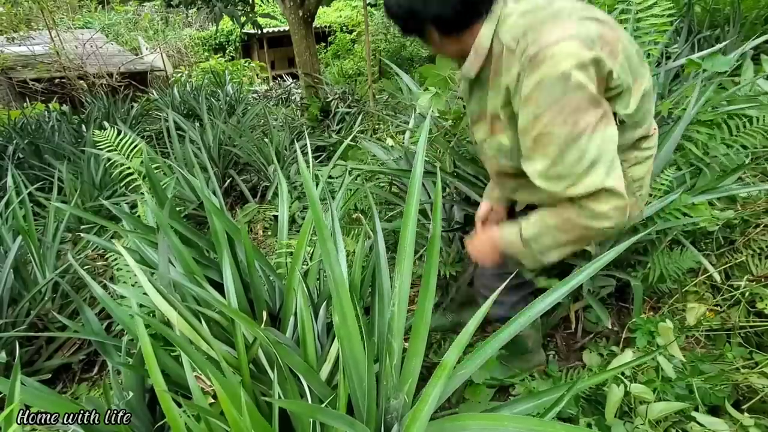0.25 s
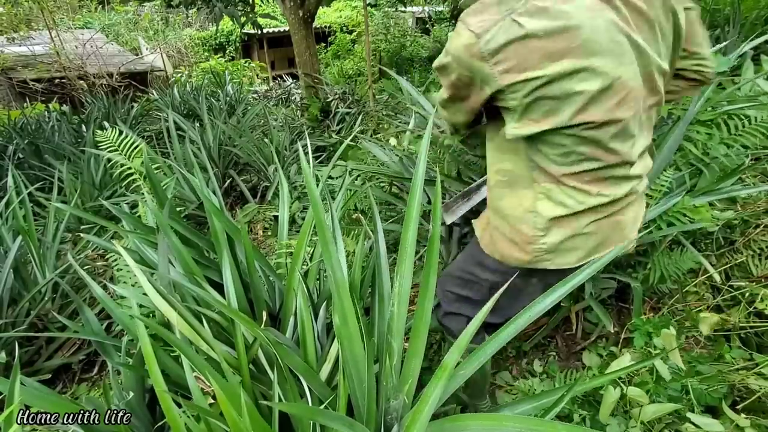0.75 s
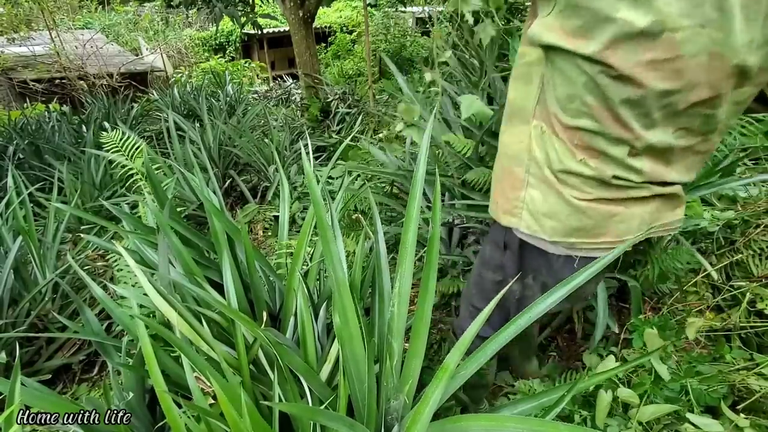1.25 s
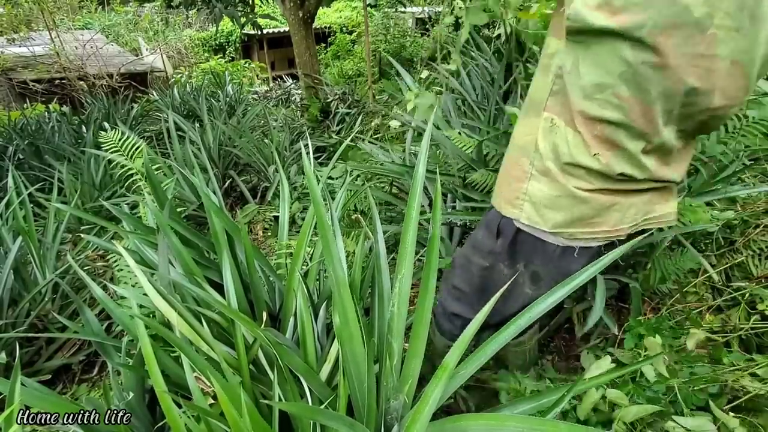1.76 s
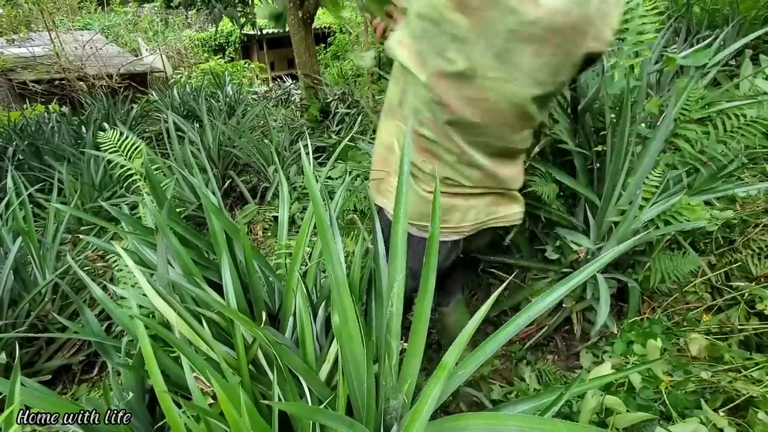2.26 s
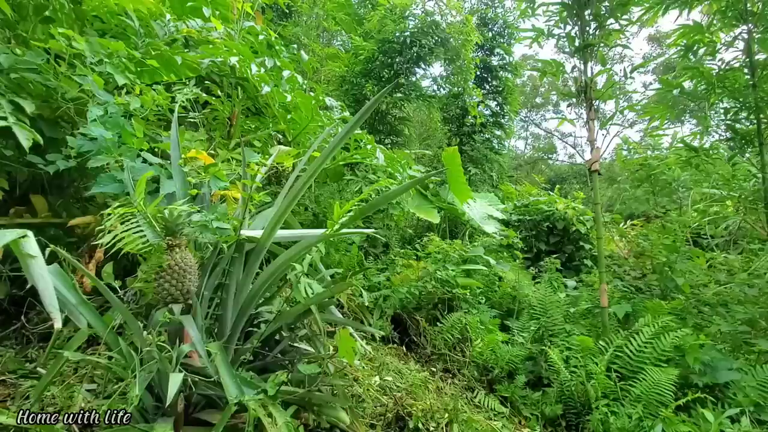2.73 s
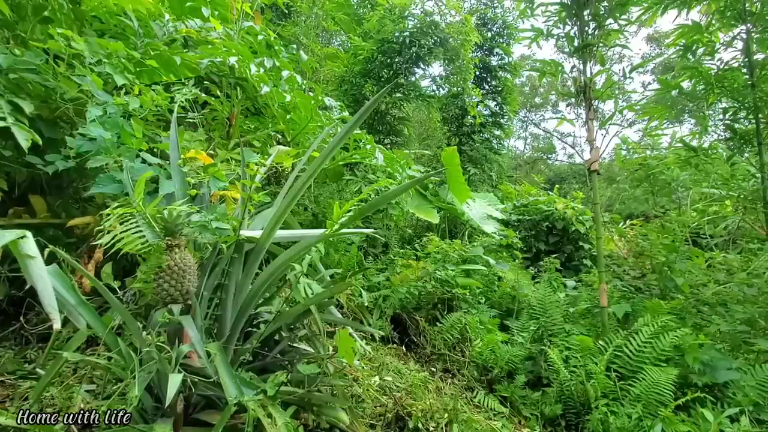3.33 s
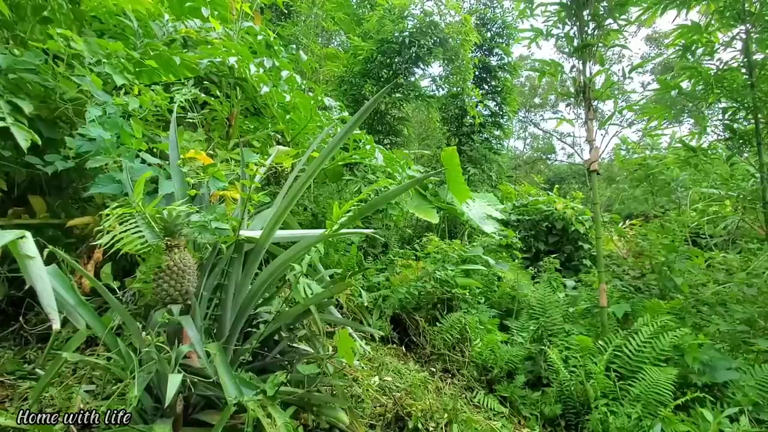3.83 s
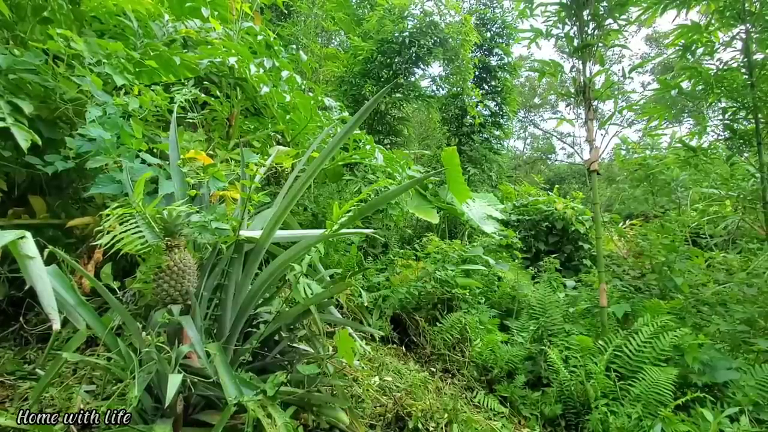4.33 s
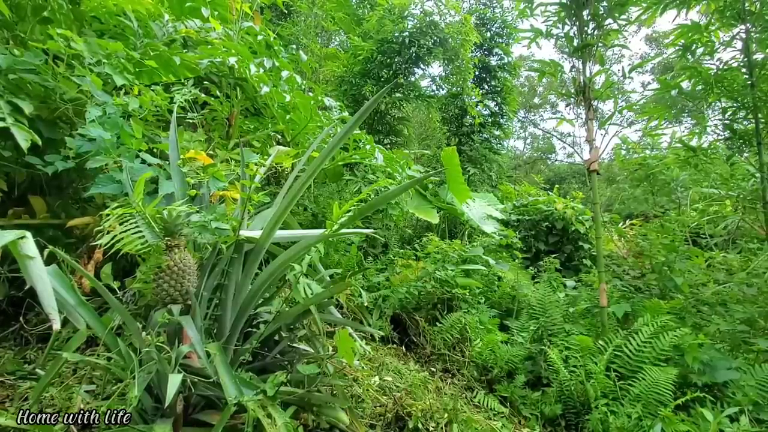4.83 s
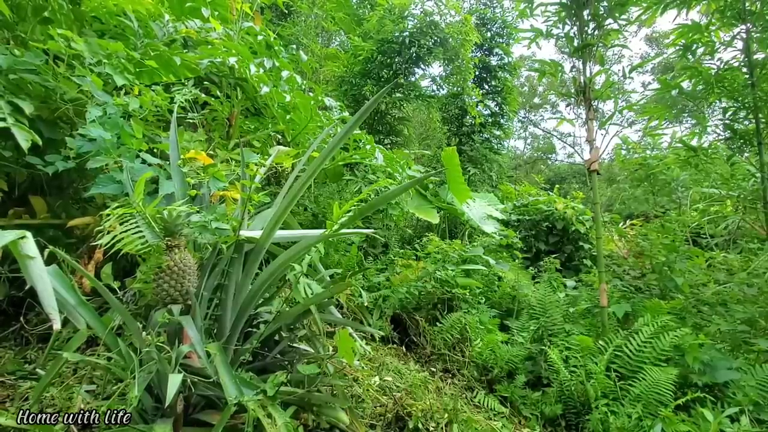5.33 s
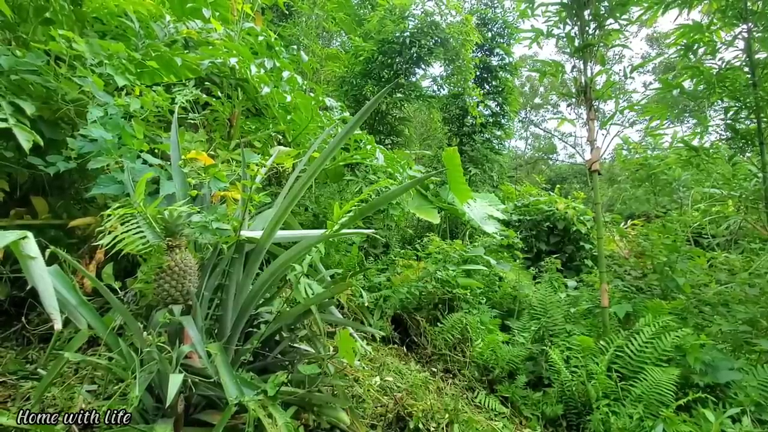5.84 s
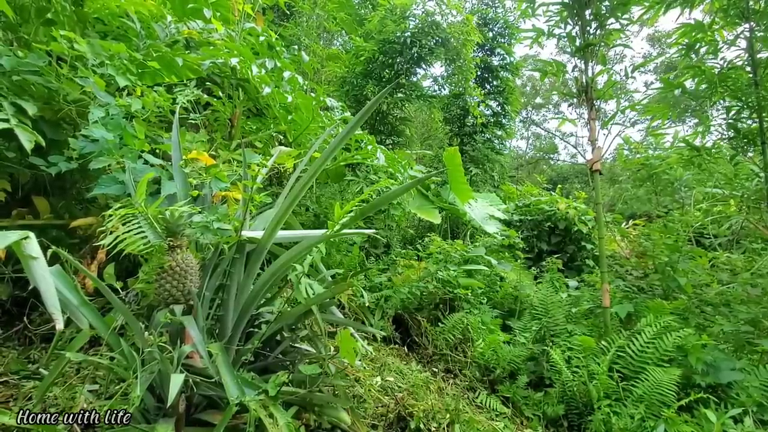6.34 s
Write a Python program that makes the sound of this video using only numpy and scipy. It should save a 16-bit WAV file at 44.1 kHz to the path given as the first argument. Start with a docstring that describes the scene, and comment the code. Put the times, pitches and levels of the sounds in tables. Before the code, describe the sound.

Weeds are pulled and slashed with rustles and sharp stem snaps outdoors, while a distant rooster crows at first and insects buzz faintly.

```python
"""A far rooster crows hoarsely over buzzing cicadas as someone starts pulling and slashing garden weeds.
Stiff leaves and stalks crackle with tiny cracks, roots tear the soil, footsteps thud, stems snap and ring.
After a short silence the work is heard from a second spot: the rooster is gone, the crickets' thin
trills come forward and a far bird whistles softly."""
import sys
import numpy as np
from scipy import signal
from scipy.io import wavfile

SR = 44100
rng = np.random.default_rng(int(sys.argv[2]) if len(sys.argv) > 2 else 0)


def bounce(signal):
    """Save signal as a 16-bit WAV file at the path given by the first command-line argument."""
    frames = np.transpose(np.atleast_2d(signal))
    limited = np.clip(frames, -1, 1)
    pcm = np.round(limited * 32767).astype(np.int16)
    wavfile.write(sys.argv[1], SR, pcm)


N = 290178
SWITCH_S = 2.715   # cut from the first spot to the second
STEP = 32   # samples between points of the slow gains
BAND_EDGES_HZ = 42 * 2 ** (np.arange(23) * .392)
BAND_HZ = np.sqrt(BAND_EDGES_HZ[1:] * BAND_EDGES_HZ[:-1])


def from_db(db):
    """Decibels to gain."""
    return np.exp(np.asarray(db) * (np.log(10) / 20))


def rms_one(x):
    """Scale to unit power."""
    return x / np.sqrt(np.mean(x ** 2) + 1e-20)


def at_hz(points, hz, column=1):
    """Read a curve on a log-frequency axis."""
    points = np.array(points)
    return np.interp(np.log(hz), np.log(points[:, 0]), points[:, column])


def by_spot(pair):
    """First value before the cut, second after."""
    cut = int(SWITCH_S * SR)
    return np.repeat(np.asarray(pair, float), [cut, N - cut])


def drift(rate_hz):
    """Smooth random modulation of unit power."""
    r = np.exp(-80 * np.pi * rate_hz / SR)
    slow = signal.lfilter([1], [1, -2 * r, r * r], rng.standard_normal(N // 40 + 2002))[2000:]
    return np.interp(np.arange(N) / 40, np.arange(len(slow)), rms_one(slow))


def resonate(x, hz, width_hz):
    """Two-pole resonance, unity gain at the peak."""
    r = np.exp(-np.pi * width_hz / SR)
    poles = [1, -2 * r * np.cos(2 * np.pi * hz / SR), r * r]
    return signal.lfilter(np.array([1, 0, -1]) * (1 - r * r) / 2, poles, x)


def share_db(spectrum):
    """Level of each band as a share of the whole."""
    inside = (BAND_HZ > spectrum[0][0]) & (BAND_HZ < spectrum[-1][0])
    power = from_db(2 * at_hz(spectrum, BAND_HZ)) * BAND_HZ * inside + 1e-9
    return 10 * np.log10(power / power.sum())


def noise_band(noises, k):
    """Band k at unit power; neighbouring bands alternate between two noises."""
    sos = signal.butter(2, BAND_EDGES_HZ[k:k + 2], "band", fs=SR, output="sos")
    return rms_one(signal.sosfilt(sos, noises[k % 2]))


def ears(direct, scattered, alike, pan_db):
    """Direct sound reaches the two microphones at different times; scattered sound is each one's own."""
    cut = int(SWITCH_S * SR)
    right = np.concatenate([np.roll(direct[:cut], -3), np.roll(direct[cut:], 20)])   # lag in samples
    both = np.sqrt(alike) * np.array([direct, right]) + np.sqrt(1 - alike) * scattered
    lean = from_db(pan_db / 2)
    return np.array([both[0] * lean, both[1] / lean])


# Stereo image at each spot: (frequency [Hz], left-right likeness [0-1], pan to the left [dB])
STEREO_IMAGE = [
    [(100, 0.92, -2), (690, 0.9, 2.5), (2500, 0.05, 1), (8000, 0.11, 0.2)],
    [(100, 0.83, -2), (700, 0.59, 4), (2390, 0.61, 0.5), (5070, 0.28, 2.5), (12900, 0.083, 4.5)],
]


def place_band(band, hz):
    """Give one band its width and pan at each spot."""
    alike, pan_db = [by_spot([at_hz(spot, hz, column) for spot in STEREO_IMAGE]) for column in (1, 2)]
    return ears(band[0], band[1:], alike, pan_db)


# Tone of the still air: (frequency [Hz], density [dB])
AIR_SPECTRUM = [(35, -27), (60, 4), (120, -11), (400, -9.5), (1200, -18), (2500, -11), (5000, -1),
                (9000, -14), (16000, -15.5)]


def still_air(spot_db):
    """A soft noise bed whose bands each waver on their own."""
    noises, out = rng.standard_normal((2, 3, N)), 0
    for k, band_db in enumerate(share_db(AIR_SPECTRUM)):
        gain = from_db(by_spot(spot_db) + band_db + 2 * drift(3))
        out += place_band(gain * noise_band(noises, k), BAND_HZ[k])
    return out


# Cricket voices: (pitch [Hz], chirp rate [1/s], level at the second spot [dB])
CRICKET_VOICES = [(3638, 15, -69), (3925, 16, -68), (4247, 14, -76)]


def crickets(spot_trim_db):
    """Thin, unevenly chirped tones that come and go."""
    out = 0
    for hz, rate, db in CRICKET_VOICES:
        chirp = 1 + .45 * np.sin(2 * np.pi * np.cumsum(rate * (1 + .25 * drift(3))) / SR)
        phase = 2 * np.pi * np.cumsum(hz * (1 + .002 * drift(8))) / SR
        tone = np.sin(phase + rng.uniform(0, 2 * np.pi, (2, 1)))
        wander_db = 2.5 * drift(4) + 1.5 * np.array([drift(5), drift(5)])
        out += tone * chirp * from_db(db + wander_db + by_spot(spot_trim_db))
    return out


def cicadas(hz, width_hz, throb_hz, depth, spot_db):
    """Throbbing noise rings in one body resonance."""
    throb = 1 + depth * np.sin(2 * np.pi * np.cumsum(throb_hz * (1 + 0.0186 * drift(0.53))) / SR)
    buzz = resonate(resonate(rng.standard_normal((2, N)) * throb, hz, width_hz), hz, width_hz)
    return rms_one(buzz) * from_db(by_spot(spot_db) + drift(2.3))


# Clear pips: (time [s], level [dB], pitch [Hz], length [s], pan to the left [dB])
CLEAR_PIPS = [(0.133, -48.5, 13600, 0.022, 8), (0.047, -48.5, 1500, 0.061, 10),
              (3.385, -75, 2306, 0.044, -6), (3.87, -71.5, 2390, 0.065, -11),
              (4.39, -81.5, 2510, 0.039, -40.5), (4.683, -72.5, 2430, 0.088, -9)]


def whistles_and_rings():
    """Soft whistles of a far bird and faint high rings, each a sine faded in and out."""
    t, out = np.arange(N) / SR, np.zeros((2, N))
    for s, db, hz, length, pan_db in CLEAR_PIPS:
        on = slice(round(s * SR), round((s + length) * SR))
        note = np.sin(np.pi * (t[on] - s) / length) * np.sin(2 * np.pi * hz * t[on])
        out[:, on] += note * from_db(db + np.array([[.5], [-.5]]) * pan_db)
    return out


# Crow syllables: (time [s], length [s], attack [s], scoop from below [share of pitch], pitch [Hz],
# sag [Hz/s], first partial [dB], second partial [dB])
CROW_SYLLABLES = [(0.044, 0.25, 0.026, 0.11, 700.5, 407, -49, -51.5),
                  (0.598, 0.65, 0.027, 0.12, 661, 61.1, -67, -50.5),
                  (1.1, 0.11, 0.035, 0.024, 608.5, 50, -54, -42),
                  (1.32, 0.066, 0.017, 0.0072, 678, 100, -34, -46),
                  (1.386, .11, 0.01, 0.0075, 685, 196, -57, -41.5),
                  (1.506, 0.16, 0.014, 0.015, 659, 151, -51.5, -46),
                  (1.924, 0.42, 0.033, .14, 675.6, 81.7, -56, -49),
                  (2.32, .3, 0.072, 0.0197, 671, 92.5, -47, -44.5),
                  (2.618, 0.081, .06, 0.0068, 620, 500, -59, -44.5)]
# Bright edge of the crow: (partial [number], level against the second partial [dB])
CROW_PARTIALS = [(3, -15), (4, -17), (5, -12)]
# Raspy overtone gliding above it: (time [s], length [s], from [Hz], to [Hz], level [dB])
CROW_GLIDES = [(.07, 0.2, 3190, 2870, -56), (1.34, 0.16, 3040, 3200, -49.5), (2.0, 0.17, 2725, 2690, -44),
               (2.08, 0.228, 3170, 3360, -43), (2.4, 0.25, 3230, 2880, -51)]


def rooster(jitter, flutter_db, hoarse, scoop_s, fade_db_per_s):
    """Partials on a wavering pitch; a hoarse throat and distant echoes break each one up on its own."""
    out, waver = np.zeros(N), drift(20.3)
    rasp = [from_db(flutter_db * drift(6.2)) * (1 + hoarse * drift(70)) for _ in range(6)]

    def sing(s, length, attack, hz_at, partials):
        """Add one syllable: swell, fade, quick stop."""
        on = slice(round(s * SR), round((s + length) * SR))
        t = np.arange(on.stop - on.start) / SR
        phase = 2 * np.pi * np.cumsum(hz_at(t) * (1 + jitter * waver[on])) / SR
        gate = np.clip(np.minimum(t / attack, (length - t) / 0.016), 0, 1)
        fade = from_db(-fade_db_per_s * np.maximum(t - attack, 0))
        out[on] += gate * fade * sum(rasp[k][on] * from_db(db) * np.sin(k * phase) for k, db in partials)

    for s, length, attack, scoop, hz, sag, first_db, second_db in CROW_SYLLABLES:
        partials = [(1, first_db), (2, second_db)] + [(k, second_db + db) for k, db in CROW_PARTIALS]
        sing(s, length, attack, lambda t: hz * (1 - scoop * np.exp(-t / scoop_s)) - sag * t, partials)
    waver += 2.2 * drift(90)   # the overtone is far less steady
    for s, length, from_hz, to_hz, db in CROW_GLIDES:
        sing(s, length, 0.038, lambda t: from_hz + (to_hz - from_hz) * t / length, [(1, db)])
    side_echoes = np.array([np.roll(out, 310), np.roll(out, 530)])
    return ears(out, side_echoes, alike=0.89, pan_db=0.66)


# Steady stir at each spot: (leaves [dB], soil [dB], stalk fullness [dB], thud [dB])
STEADY_STIR = [(-50, -64.5, -2, -23), (-114, -98, -6, 18)]
# Pulls, slashes, brushes and low footstep thuds: (time [s], attack [s], decay [dB/s], leaves [dB],
# soil [dB], stalk fullness [dB], thud [dB])
WORK_STROKES = [(.035, .045, 83, -55.5, -79, 26, -11), (.44, 0.11, 88, -41.5, -53.5, -0.5, -16),
                (.6, 0.065, 85, -38.5, -79, -10, -9), (0.928, 0.13, 67, -33.5, -48.5, -3.5, 0),
                (1.33, 0.0065, 219, -35.5, -50.5, -3, 10.5), (1.45, 0.056, 94, -41, -61, -5, 14),
                (1.66, 0.015, 88, -40.5, -54.5, -7.5, -4), (1.958, .1, 58, -35.5, -49.5, -4.5, 7),
                (2.09, 0.089, 87, -48.5, -65, 8, 21), (2.25, 0.06, 64, -45, -55, 1.5, -12),
                (2.49, 0.015, 152, -52, -58.5, 2, 27), (2.38, 0.079, 20, -43, -59.5, -1, 11),
                (2.722, 0.013, 190, -54.5, -60, 4, 10.5), (2.899, 0.17, 32, -53, -63.5, -0.5, -11),
                (3.549, 0.032, 234, -61, -60, -24.5, 1), (3.63, 0.032, 157, -48, -50.5, -4, -6.5),
                (3.715, 0.0095, 206, -53, -61, -4, 18), (3.926, 0.03, 200, -26.5, -41.5, -4.5, -3),
                (4.18, 0.024, 131, -65, -86, -1, 4), (4.42, .17, 283, -55, -63, -5.5, -1),
                (4.7, 0.19, 95.5, -57.5, -75, -3.5, 3.5), (5.023, 0.016, 147, -30.5, -42.5, -3, -2),
                (5.038, 0.043, 113, -27.5, -40, -2.5, 2), (5.4, 0.098, 160, -45.5, -67.5, -1.5, 1.5),
                (5.818, .01, 150, -37, -61, -2.5, 5), (5.83, .035, 113.5, -30.5, -41.5, -4.5, -3),
                (6.15, 0.29, 65.5, -50.5, -68.5, -2.5, 3), (6.357, 0.0033, 447, -28.5, -59, -12.5, -9),
                (6.499, 0.004, 350, -23.5, -64, -13.5, 5.5)]


def stroke_envelopes(settle_db=-19, settle_db_per_s=44, settled_full_db=0.5, settle_tone_s=0.12):
    """Strokes swell, fall and settle over the stir: (level, colour) in dB for leaves, then for soil."""
    t = np.arange(0, N, STEP) / SR
    start, attack, decay, leaves_db, soil_db, full_db, thud_db = np.transpose(WORK_STROKES)[:, :, None]
    same_spot = (t > SWITCH_S) == (start > SWITCH_S)
    swell = np.clip((t - start) / attack, 0, 1) * same_spot
    after = np.maximum(t - start - attack, 0)
    settling = from_db(settle_db - settle_db_per_s * after)
    leaves = swell ** 0.83 * from_db(leaves_db) * np.hypot(from_db(-decay * after), settling)
    soil = swell ** 1.82 * from_db(soil_db - 0.97 * decay * after)   # soil swells later
    full_db = settled_full_db + (full_db - settled_full_db) * np.exp(-after / settle_tone_s)
    stir = np.array(STEADY_STIR)[(t > SWITCH_S).astype(int)].T
    out = []
    for k, (gain, colour_db) in enumerate([(leaves, full_db), (soil, thud_db)]):
        stir_power = from_db(2 * stir[k])
        power = (gain ** 2).sum(0) + stir_power
        blend_db = ((gain ** 2 * colour_db).sum(0) + stir_power * stir[k + 2]) / power   # loudest leads
        out.append((10 * np.log10(power), blend_db))
    return out


# Tone of stiff leaves at each spot: (frequency [Hz], density [dB])
LEAF_SPECTRA = [
    [(290, -1), (500, -12.5), (855, 2), (1030, -6), (1190, -2), (1690, -4), (2500, -2), (7860, -7),
     (14500, -15), (16000, -25)],
    [(290, -43), (500, -11), (988, -11), (1740, -6), (3300, -1.5), (4280, -5.5), (6610, -5), (7980, -9),
     (14900, -12.5), (16000, -15)],
]
# Tone of tearing soil at each spot: (frequency [Hz], density [dB])
SOIL_SPECTRA = [
    [(21, -44), (35, 5.5), (590, 3.5), (645, -18), (1040, -10), (1200, -30), (1560, -61), (2640, -120)],
    [(21, -37), (35, -14), (64, 2.5), (247, -3), (396, -8), (1200, -21), (1560, -62), (2640, -120)],
]


def weeds(cracks_per_s, spread_db, clump_db, patchy_db):
    """Countless tiny cracks, clumped, coloured band by band by leaf, stalk and soil."""
    (leaves_db, full_db), (soil_db, thud_db) = stroke_envelopes()
    sizes = from_db(spread_db * np.minimum(rng.exponential(1, (2, 1, N)), 5) + clump_db * drift(51))
    cracks = (rng.random((2, 1, N)) < cracks_per_s / SR) * sizes
    smear = signal.lfilter([.05], [1, -.95], cracks ** 2)   # scattered copies trail each crack
    grains = rng.standard_normal((2, 3, N)) * np.sqrt(smear / smear.mean() + 0.5)
    leaf_eq = np.array([share_db(spot) for spot in LEAF_SPECTRA])
    soil_eq = np.array([share_db(spot) for spot in SOIL_SPECTRA])
    out = 0
    for k, hz in enumerate(BAND_HZ):
        stalks = np.clip(np.log(6000 / hz) / np.log(2.2), 0, 1) * full_db   # fill in below the leaves
        thud = np.clip(np.log2(170 / hz), 0, 1) * thud_db
        leaves = from_db(leaves_db + stalks + by_spot(leaf_eq[:, k])[::STEP])
        soil = from_db(soil_db + thud + by_spot(soil_eq[:, k])[::STEP])
        gain = np.hypot(leaves, soil) * from_db(patchy_db * drift(9.6)[::STEP])
        gain = np.interp(np.arange(N) / STEP, np.arange(len(gain)), gain)
        out += place_band(gain * noise_band(grains, k), hz)
    return out


# Breaking stems, plus two hollow knocks with a low ring near 400 Hz at 3.672 s and 4.59 s: (time [s], level
# [dB], ring [Hz], 60 dB decay [s], splintering [0-1], # pan to the left [dB])
STEM_BREAKS = [(.325, -26.5, 5200, 0.053, 0.6, 0), (.54, -27, 3540, .02, 0, 4),
               (.612, -23.5, 4200, 0.032, 0.28, 1), (0.541, -25.5, 2100, 0.01, 0, -3),
               (.550, -32, 2110, 0.024, 0.1, -4), (0.564, -18.5, 1940, 0.031, 0.25, 2),
               (0.573, -16, 3030, 0.023, 0.06, 3.5), (.579, -20, 2075, 0.089, 1, 0),
               (.611, -22, 1970, 0.079, 0.83, 0.5), (.669, -34, 2500, .02, 0.4, 0),
               (0.687, -28.5, 1870, 0.011, 0.09, 0), (0.711, -29.5, 1840, .025, 0.37, 0),
               (0.989, -25, 2570, 0.13, 1, 1), (1.338, -22.5, 793, 0.022, 0, -1),
               (1.68, -32.5, 606, 0.037, 0.34, 0), (2.059, -29, 866, 0.079, 0.4, -2),
               (2.47, -33, 3890, 0.047, 0, -3), (3.208, -40, 2920, 0.034, 0, 1),
               (3.665, -38, 4570, 0.027, 0.9, 5), (3.672, -41, 373, 0.07, 0, 0),
               (4.59, -47, 430, 0.061, 0.08, 0), (5.49, -48, 5000, 0.039, .8, 2),
               (3.931, -25, 4700, 0.028, 0.55, 6), (3.946, -22.5, 2280, 0.06, 0.63, 3),
               (5.033, -17.5, 6190, 0.039, 0.08, 7), (5.861, -25, 5170, 0.078, 0.02, 3),
               (5.829, -32, 5000, .03, .6, 3), (6.334, -37, 5230, .02, 0.7, 7),
               (6.355, -48, 6000, .015, .6, 6), (6.359, -23, 6400, 0.022, 0, 16),
               (6.361, -36, 1560, 0.036, 0.3, 10), (6.493, -23, 4660, 0.028, 0.47, 7),
               (6.502, -16.5, 4270, 0.014, 0.27, 9), (6.511, -26, 1900, 0.049, 0.9, 2)]


def stem_snaps():
    """A sharp click and a dying puff of noise: through the stem's narrow ring, and as broad splintering."""
    out, pan = np.zeros((3, N)), np.zeros(N)
    t = np.arange(2600) / SR
    broad = signal.butter(1, [2500, 9000], "band", fs=SR, output="sos")
    click = 1 + 2 * np.exp(-t / .001)
    for s, db, hz, t60, splinter, pan_db in STEM_BREAKS:
        puff = rng.standard_normal((3, len(t)))
        envelope = from_db(-60 * t / t60) * np.minimum(t / 0.00021, 1)
        ring = rms_one(resonate(resonate(puff, hz, 0.39 * hz), hz, 0.39 * hz))
        ring += 1.07 * np.sin(2 * np.pi * hz * t)
        crack = signal.sosfilt(broad, envelope * puff[:, ::-1] * click)
        snap = resonate(envelope * ring, hz, hz) + (0.46 + 3 * splinter) * crack
        snap *= from_db(db) / np.abs(snap).max(1, keepdims=True)
        i = round(s * SR)
        out[:, i:i + len(t)] += snap[:, :N - i]
        pan[i:] = pan_db
    return ears(out[0], out[1:], alike=0.42, pan_db=pan)


# Fader dip to near silence between the spots: (time [s], level [dB])
CUT_FADER = [(2.692, 0), (2.695, -16), (2.71, -45), (2.723, -34), (2.728, 0)]


def scene():
    """The garden and the weeding, heard from two spots in turn."""
    garden = still_air(spot_db=(-52.5, -62))
    garden += crickets(spot_trim_db=(-8, 0))
    garden += cicadas(hz=4980, width_hz=720, throb_hz=31.5, depth=0.16, spot_db=(-56.5, -57.5))
    garden += whistles_and_rings()
    garden += rooster(jitter=.012, flutter_db=3.0, hoarse=0.45, scoop_s=0.069, fade_db_per_s=39)
    garden += weeds(cracks_per_s=2500, spread_db=2.5, clump_db=-1.5, patchy_db=2.5)
    garden += stem_snaps()
    fader_db = np.interp(np.arange(N) / SR, *np.transpose(CUT_FADER))
    return garden * from_db(fader_db)


def record(dry):
    """A narrow dip in the treble near 8 kHz, a rumble filter, then a steep top cut."""
    dipped = dry - 0.53 * resonate(dry, hz=8210, width_hz=1900)
    low_cut = signal.butter(2, 50, "high", fs=SR, output="sos")
    top_cut = signal.cheby2(14, 70, 16328, fs=SR, output="sos")
    return signal.sosfilt(top_cut, signal.sosfilt(low_cut, dipped))


dry = scene()
out = record(dry)
bounce(out)
```